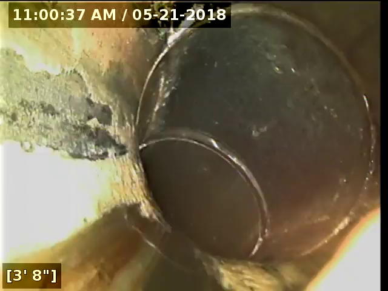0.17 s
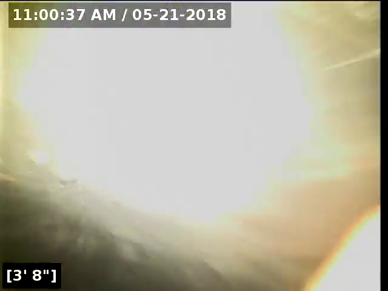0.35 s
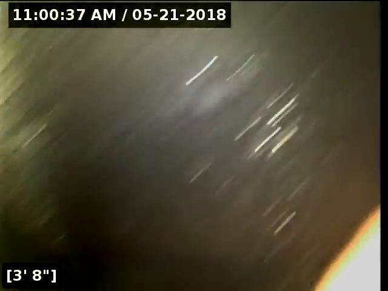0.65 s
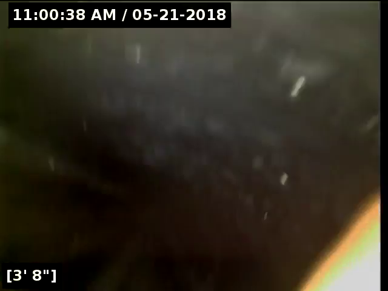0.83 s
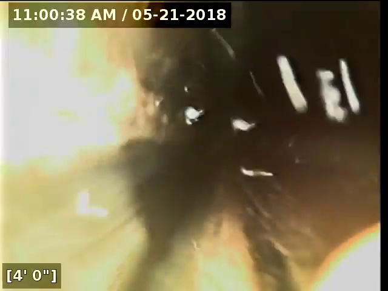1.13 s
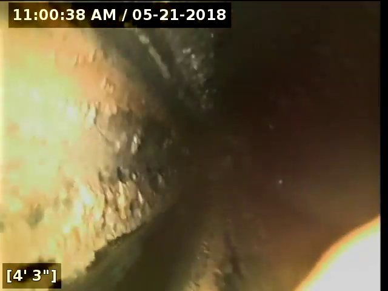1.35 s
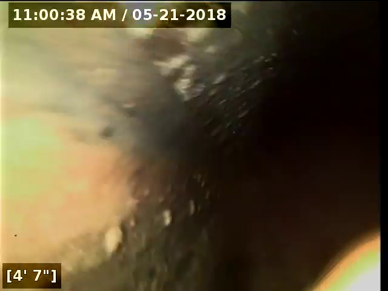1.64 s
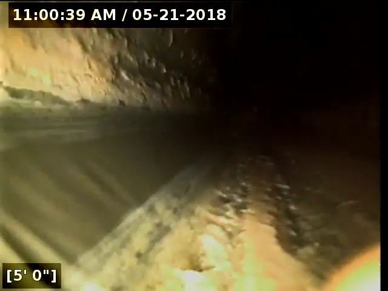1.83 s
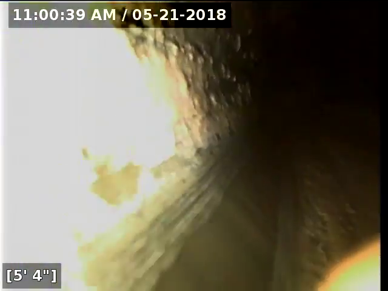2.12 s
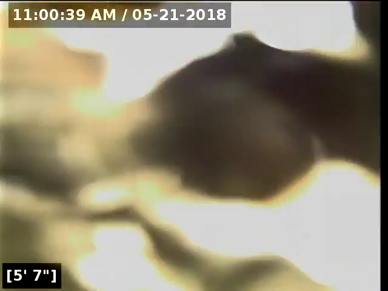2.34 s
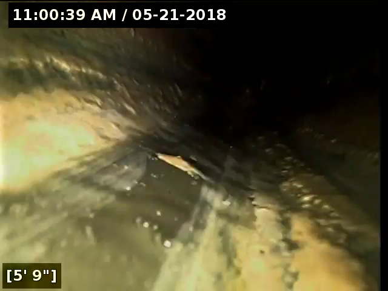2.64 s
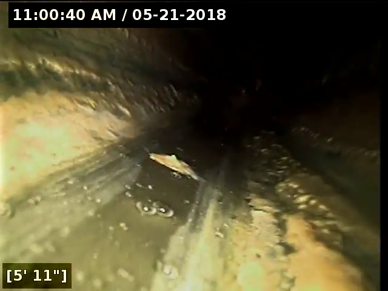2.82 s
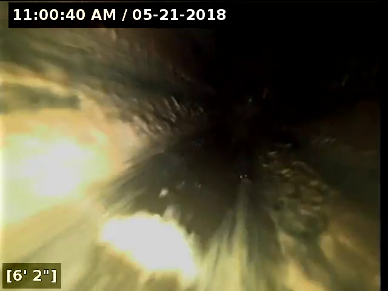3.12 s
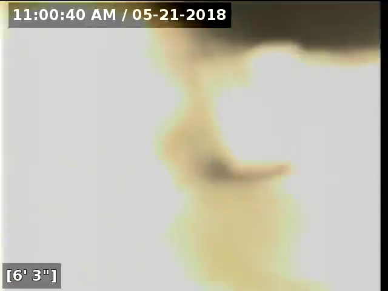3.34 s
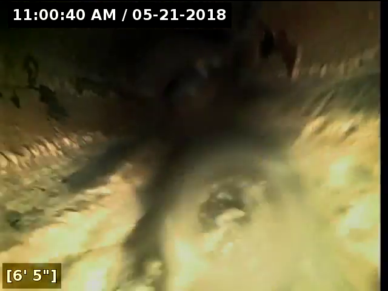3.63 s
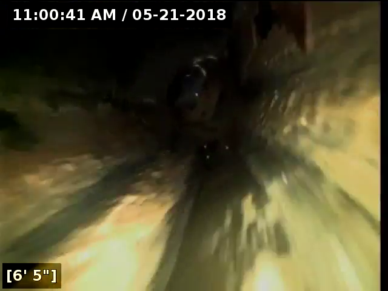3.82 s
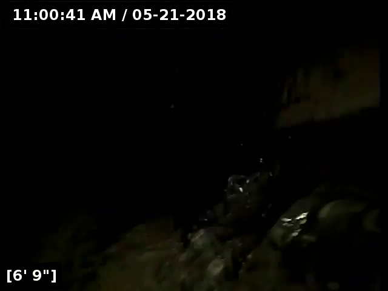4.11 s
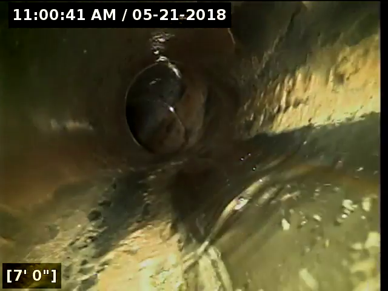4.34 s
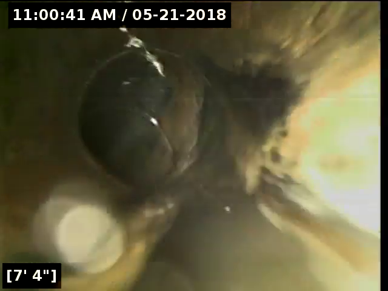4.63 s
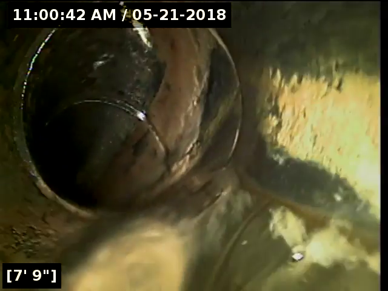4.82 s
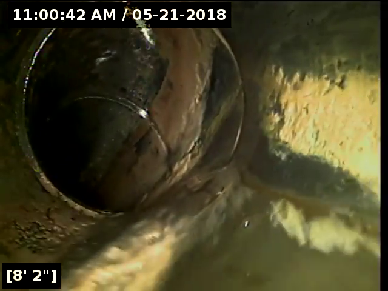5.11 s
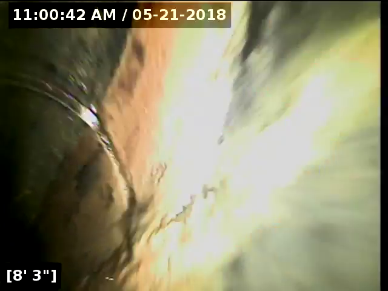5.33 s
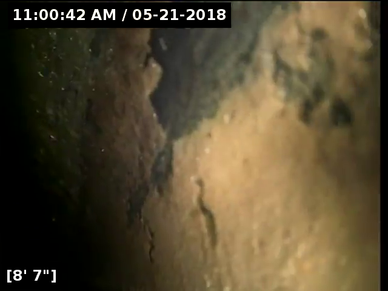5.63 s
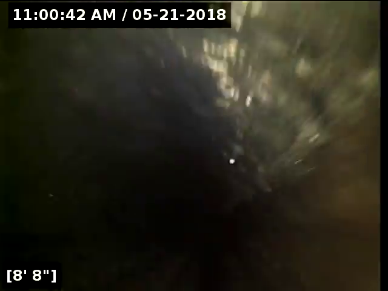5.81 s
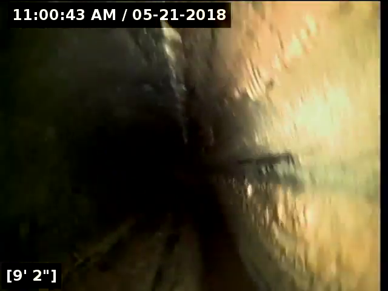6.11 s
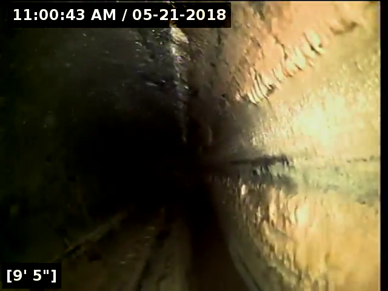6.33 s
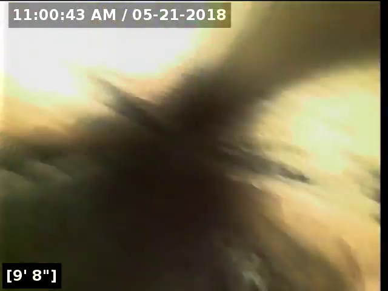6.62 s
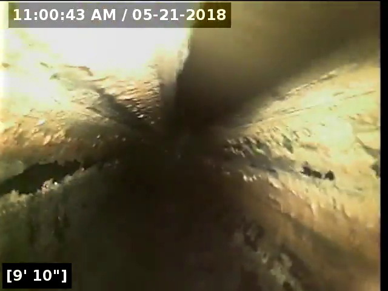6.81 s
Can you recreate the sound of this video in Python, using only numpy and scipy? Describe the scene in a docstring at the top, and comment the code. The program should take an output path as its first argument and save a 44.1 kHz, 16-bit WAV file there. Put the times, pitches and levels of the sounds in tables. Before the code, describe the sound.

Close and dry, with slight pipe hollowness: rubbing cable, a lumpy rolling reel and scattered clicks and thuds. A violent crack comes within the first second, then several medium knocks, another sharp blow near the middle, and quieter pushing after. Two rough creaking groans appear in the later part, with sound cutting out completely for an instant between them. The small microphone distorts on the strongest hit and lacks high treble.

```python
"""Push cable fed into a drain pipe

An inspection camera's stiff cable is shoved by hand from its reel into a plastic pipe. Each shove
makes shaped noise: hiss and rub. The reel rolls on with a noisy whirr and a rumble. Knocks on pipe
and frame are short noise bursts plus ringing tones. Twice a hard drag makes the reel groan: rasping
resonances and a rough tone. Strong peaks overload the small microphone, and the sound drops out briefly."""
import sys
import numpy as np
from scipy import signal
from scipy.fft import rfft, irfft, next_fast_len
from scipy.io import wavfile
from scipy.ndimage import uniform_filter1d

SR = 44100
rng = np.random.default_rng(int(sys.argv[2]) if len(sys.argv) > 2 else 0)


def wrap_up_sound(samples):
    """Save the sound to the file named by the first command line argument, as 16-bit audio."""
    columns = np.atleast_2d(samples).T
    # keep every value between -1 and 1, then stretch to whole-number steps
    tamed = np.clip(columns, -1, 1)
    steps = np.round(tamed * 32767).astype(np.int16)
    wavfile.write(sys.argv[1], SR, steps)


N = 306936   # samples, just under 7 s
TIME = np.arange(N) / SR

# In all tables, levels are relative: each layer's trims and spectra are applied on top.

# background noise: f/Hz, level/dB
FLOOR = [(18, -49), (30, -15.5), (58, -16.5), (79, -0.5), (523, -15), (800, -9), (1090, -20.5), (2260, -17),
         (4090, -34.5), (6400, -24), (8500, -33.5), (11000, -74), (18700, -120)]
FLOOR_DB = -55.5

# the reel rolls on: start t/s, length t/s, whirr level/dB, rumble level/dB, starting whirr f/Hz
ROLLS = [(-.1, 0.076, -41, -45.5, 689), (.45, 0.12, -53.5, -47.5, 720), (.57, 0.34, -43, -51, 745),
         (.97, 0.26, -42, -48, 770), (1.235, 0.15, -39.5, -45, 730), (1.65, 0.22, -43.5, -48.5, 700),
         (1.92, 0.099, -40.5, -46.5, 699.4), (2.05, 0.19, -52, -47, 645.7), (2.47, 0.11, -55, -54, 713),
         (2.62, 0.14, -48.5, -50, 768), (2.74, 0.13, -53.5, -47, 730), (3.0, 0.19, -66.5, -59, 705),
         (3.25, .1, -52.5, -50.5, 734), (3.42, 0.21, -47, -51.5, 725.5), (3.63, 0.1223, -45.5, -45.5, 700),
         (3.8, .2, -59.5, -55, 680), (4.03, .17, -51.5, -62, 752), (4.24, 0.18, -50, -49.5, 778),
         (4.72, .2, -54.5, -51, 650.6), (5.09, 0.17, -58.5, -53, 679.7), (5.4, 0.22, -47, -52, 680),
         (5.58, 0.22, -55, -50, 642.3), (5.98, 0.19, -60.5, -56, 745.6), (6.14, 0.1298, -52, -51, 752),
         (6.32, .14, -52, -47, 797), (6.69, 0.21, -51.5, -45.5, 749), (6.89, .1, -41.5, -52.5, 780)]
# each roll starts quickly, loses level and pitch to friction, then dies away
ROLL_ATTACK_S, ROLL_RELEASE_S, ROLL_LOSS_DB_PER_S, WHIRR_SAG_HZ_PER_S = 0.011, 0.0722, 16.5, 320
IDLE_RUMBLE_DB = -60   # steady rumble of the reel rocking
# spectrum of the reel's rumble: f/Hz, level/dB
RUMBLE = [(25, -20.5), (60, -29), (110, 12), (170, 14), (280, 12), (380, -5), (450, 8), (600, 6),
          (1100, -53)]

# hand shoves: t/s of top speed, speeding-up t/s, slowing-down t/s, hiss level/dB, rub level/dB
SHOVES = [(.02, 0.041, 0.037, -61, -50), (0.509, 0.059, .17, -56.5, -46), (1.111, 0.1, 0.082, -51, -51),
          (1.77, .09, .08, -49.5, -49.5), (2.2, 0.06, 0.12, -87, -63), (2.38, .09, 0.16, -53, -51),
          (2.68, .05, 0.077, -58.5, -54), (2.93, 0.047, .1, -82, -55.5), (3.09, 0.079, 0.1, -55.5, -60),
          (3.45, 0.058, 0.16, -54.5, -49.5), (4.021, 0.085, 0.23, -55, -52), (4.68, 0.095, .1, -56, -59),
          (4.831, 0.068, 0.11, -49.5, -51), (5.25, 0.028, 0.042, -72, -62), (5.48, 0.1, 0.12, -52, -54.5),
          (6.07, .15, .1, -53, -51), (6.68, .14, 0.12, -53.5, -52)]
CREEP_HISS_DB, CREEP_RUB_DB = -70, -73   # the cable keeps creeping between shoves
# spectrum of the cable's fine hiss: f/Hz, level/dB
HISS = [(2500, -3), (3500, -6), (4800, -5.5), (6400, 0), (7300, -2), (8200, -10), (9000, -27.5)]
# spectrum of the cable's coarser rub: f/Hz, level/dB
RUB = [(300, 6), (700, -10.5), (1000, 4), (1400, 6), (2050, -2.5), (2500, 6), (2850, 3), (3400, -6.5),
       (4500, -30.5), (7000, -23.5)]
# natural tones (modes) of pipe and reel frame: f/Hz, level/dB
BODY = [(195, -7.5), (278, 3), (320, 0.5), (465, 1.5), (752, 3), (850, -2.5), (1022, -3), (1427, -5.5),
        (1589, -18.5), (1748, -19.5), (2169, -9), (2487, -5), (2718, -10), (2870, 4)]

# cable knocks on pipe and frame: t/s, strength level/dB, tilt/dB per octave, treble loss/dB per octave,
# contact t/s, extra thud level/dB, hollow note level/dB relative to the blow
KNOCKS = [(.459, -46.5, 0.5, 13, 0.0049, 4, -11), (.579, -42, 5, 22, 0.0054, -6, -21),
          (0.59, -53, -8, 10, 0.0052, 4, -17), (.650, -56.5, 14, 25.5, .0045, 5, -4),
          (0.726, -24.5, -2.5, 28, 0.00046, 11.5, 8), (.7276, -11.5, -2, 5, 0.0028, -13, -12),
          (0.825, -28, -2.2, 54, 0.0079, 9, -22), (.889, -35.5, -1.5, 25, 0.0042, 4.5, 1.5),
          (.967, -48.5, 3, 18, 0.0043, 1, -17), (1.182, -31.5, -5, 23, 0.0018, -7, 0),
          (1.237, -36.5, 3, 13, .005, -7, -6), (1.454, -30, -6, 14, 0.0052, -0.5, -5.5),
          (1.732, -52, 7.5, 16, 0.0044, -2, -7), (1.771, -44.5, 1, 0.5, 0.0076, 8.5, -18),
          (1.839, -46, 7, 18.5, .0036, 3, -10), (1.927, -46, -2, 9, 0.0041, -3, -16),
          (1.997, -54, 4, 24, 0.0034, -5, -10), (2.078, -52.5, -9, 4, 0.0061, 9.5, 2),
          (2.267, -51, -2, 10, .006, -4, 4), (2.752, -48, -9.5, 6, 0.00516, 1, -11),
          (3.2044, -20, -1, 8, 0.0045, 5.5, -7), (3.301, -52.5, 6, 20.5, .0042, -3, 1),
          (3.336, -44.5, 2.5, 18.5, 0.0019, -7, -4), (3.546, -42, 6, 16.5, 0.0028, -2, -1),
          (3.627, -47, 5, 23, 0.0046, 0, -9), (3.686, -49, 0, 11, 0.0048, 1, 8),
          (3.976, -50, 5.5, 19, 0.0025, -6, -15), (4.101, -51, 4.5, 14.5, .003, -7, -5),
          (4.185, -43, -2.5, 8, 0.0041, -13, -11), (4.426, -30.5, -2, 6, 0.0043, -2, -4),
          (4.495, -68, 14.5, 29, 0.0014, 8, -6), (5.089, -42.5, -3, 11, .012, 2, -9.5),
          (5.568, -47.5, 4.5, 15.5, 0.0056, 4, -13), (5.8295, -39.5, 3, 49, .0057, 16, 8.5),
          (5.881, -57, -5.5, 20, 0.0085, 20, 2), (6.163, -45, 7, 17, 0.0057, 0, -11),
          (6.182, -51, 2, 16, 0.0089, -2, -12), (6.433, -64.5, 11.5, 27, .008, -3, 2),
          (6.774, -40.5, 6, 16.5, 0.0049, 2, -6), (6.874, -50, -2, 14, 0.00326, -9, -14),
          (6.939, -46, -4, 9, 0.012, 4, 3)]
# dying away of the knock's noise, by pitch: f/Hz, t/s to fall 60 dB
KNOCK_RING = [(60, .07), (270, 0.14), (500, 0.012), (1000, 0.051), (2500, 0.058), (7000, 0.041)]
# spectrum of the knock's noise: f/Hz, level/dB
KNOCK_COLOUR = [(40, -23.5), (130, -31), (200, -10.5), (290, -3.5), (450, -0.5), (610, -2.5), (800, 1),
                (1300, -1.5), (2600, 0), (3500, -5.5), (4800, -11.5), (6500, 9.5), (8500, -43)]
# ring of the modes, damped by the cable that stays against them: f/Hz, t/s to fall 60 dB
MODE_RING = [(195, .07), (280, .08), (330, .062), (470, .05), (750, .06), (1500, .055), (2900, .045)]
# the tilt pivots on the centre pitch; treble loss starts at the edge; modes below THUD_HZ make the thud
KNOCK_CENTRE_HZ, KNOCK_EDGE_HZ, THUD_HZ = 787, 2450, 380
KNOCK_ARCH_DB = 1   # loss per squared octave away from the centre
KNOCK_FLAT_BELOW_HZ = 510   # a blow is equally strong at all pitches below this
HOLLOW_HZ, HOLLOW_T60_S = 436, 0.16   # the pipe's hollow note and its time to fall 60 dB

# the cable drags hard on the reel: start t/s, length t/s, level/dB
DRAGS = [(4.761, 0.15, -39), (5.406, 0.096, -40.5)]
DRAG_ATTACK_S, DRAG_RELEASE_S, DRAG_LOSS_DB_PER_S = .05, .06, 14
SLIP_HZ, SLIP_RISE_HZ_PER_S = 302, 35.2   # stick-slip rate halfway through a drag, and its climb
# harmonics of the groan's tone: multiple of the slip rate, level/dB
GROAN_TONES = [(1, -11), (2, -4), (3, -21)]
# resonances of the groan's rasp: f/Hz, half the width f/Hz of each of its two filters, level/dB
GROAN = [(726, 13, -1), (1134, 8.5, 1), (1270, 66, -1.5), (1490, 19, 1), (1610, 4.9, 7.5),
         (1783, 26, -18.5), (1930, 95, -0.5), (2780, 180, -2.5), (2990, 23, 2.5), (3310, 41, -8.5)]

# silent gap: from t/s, to t/s
DROPOUT = (4.953, 5.088)
NOTCH_HZ, NOTCH_WIDTH_HZ = 4040, 760     # dip in the treble
ROLLOFF_HZ, CUTOFF_HZ = 7200, 8700       # gentler, then steep top edge


def from_db(db):
    """Turn decibels into a gain."""
    return np.exp(np.asarray(db) * (np.log(10) / 20))


def rms_one(x):
    """Scale to an average (rms) strength of 1."""
    return x / np.sqrt(np.mean(x ** 2) + 1e-20)


def at_hz(points, hz):
    """Read a table between its rows, with pitch on a logarithmic axis."""
    table_hz, values = np.array(points).T
    return np.interp(np.log(hz), np.log(table_hz), values)


def drift(rate_hz):
    """Random wander of spread 1: noise smoothed by a double pole at the rate."""
    step = 40   # one wander value per 40 samples
    r = np.exp(-2 * np.pi * step * rate_hz / SR)
    noise = rng.standard_normal(N // step + 2002)
    slow = signal.lfilter([1], [1, -2 * r, r * r], noise)[2000:]   # skip the settling-in
    return np.interp(np.arange(N) / step, np.arange(len(slow)), rms_one(slow))


def resonate(x, hz, width_hz):
    """Let one resonance ring, with a gain of about 1 at its peak."""
    r = np.exp(-np.pi * width_hz / SR)
    feed = np.array([1, 0, -1]) * (1 - r * r) / 2
    feedback = [1, -2 * r * np.cos(2 * np.pi * hz / SR), r * r]
    return signal.lfilter(feed, feedback, x + 1e-18)


def colour(x, spectrum):
    """Multiply a steady noise by a spectrum, then scale to rms 1."""
    size = next_fast_len(N)
    hz = np.maximum(np.arange(size // 2 + 1) * SR / size, 1)
    shaped = rfft(x, size) * from_db(at_hz(spectrum, hz))
    return rms_one(irfft(shaped, size)[:N])


def friction(per_s, spread_db, flutter_db):
    """Rubbing is many tiny slips of uneven size, coming in clumps."""
    happens = rng.random(N) < per_s / SR
    slips = happens * rng.standard_normal(N) * from_db(spread_db * rng.standard_normal(N))
    return rms_one(slips * from_db(flutter_db * drift(25)))


def stroke(start, length, attack_s, release_s, loss_db_per_s):
    """Gain of one movement: it builds up, holds while slowly fading, and dies away."""
    t = np.maximum(TIME - start, 0)
    build_up = np.minimum(t / attack_s, 1)
    release = np.exp(-np.maximum(t - length, 0) / release_s)
    return build_up * from_db(-loss_db_per_s * t) * release


def drag():
    """Strength of the hard drag on the reel, as a gain that also holds back rub and roll."""
    return sum(from_db(db) * stroke(s, length, DRAG_ATTACK_S, DRAG_RELEASE_S, DRAG_LOSS_DB_PER_S)
               for s, length, db in DRAGS)


def background():
    """Faint steady noise shaped by its own spectrum."""
    return from_db(FLOOR_DB) * colour(rng.standard_normal(N), FLOOR)


def reel_motion():
    """Gains of whirr and rumble, and the whirr's pitch, which sinks as each roll slows."""
    whirr_power, rumble_power = np.zeros(N), from_db(2 * IDLE_RUMBLE_DB)
    pitch = np.full(N, float(ROLLS[0][-1]))
    for s, length, whirr_db, rumble_db, hz in ROLLS:
        speed = stroke(s, length, ROLL_ATTACK_S, ROLL_RELEASE_S, ROLL_LOSS_DB_PER_S)
        power = (speed * from_db(whirr_db)) ** 2
        # a roll sets the pitch where it outweighs all earlier rolls together
        pitch = np.where(power > whirr_power, hz - WHIRR_SAG_HZ_PER_S * (TIME - s), pitch)
        whirr_power = whirr_power + power
        rumble_power = rumble_power + (speed * from_db(rumble_db)) ** 2
    return np.sqrt(whirr_power), np.sqrt(rumble_power), pitch


def rolling(whirr_gain, rumble_gain, whirr_hz, whirr_trim_db=-3, rumble_trim_db=-1,
            bump_edge_hz=80, braking_db=-50):
    """The reel turns on its hub: a lumpy rumble and a narrow band of noise at the whirr's pitch."""
    smooth = signal.butter(2, bump_edge_hz, fs=SR, output="sos")
    bumps = signal.sosfilt(smooth, rng.standard_normal((2, N)))
    carrier = np.exp(2j * np.pi * np.cumsum(whirr_hz) / SR)
    # multiplying by the carrier lifts the slow noise up to the whirr's pitch
    whirr = rms_one(np.real((bumps[0] + 1j * bumps[1]) * carrier))
    rumble = colour(friction(per_s=1700, spread_db=1.5, flutter_db=2.0), RUMBLE)
    free = 1 / np.sqrt(1 + drag() / from_db(braking_db))   # drag brakes the reel
    return free * (whirr_gain * from_db(whirr_trim_db) * whirr
                   + rumble_gain * from_db(rumble_trim_db) * rumble)


def shoving(rub_follows=0.41):
    """Gains of hiss and rub: a shove is a bell of speed, which the rub follows less steeply."""
    hiss_power, rub_power = from_db(2 * CREEP_HISS_DB), from_db(2 * CREEP_RUB_DB)
    for s, rise_s, fall_s, hiss_db, rub_db in SHOVES:
        width_s = np.where(TIME < s, rise_s, fall_s)
        speed = np.exp(-np.minimum(((TIME - s) / width_s) ** 2, 20))
        hiss_power = hiss_power + (speed * from_db(hiss_db)) ** 2
        rub_power = rub_power + (speed ** rub_follows * from_db(rub_db)) ** 2
    return np.sqrt(hiss_power), np.sqrt(rub_power)


def scratches(per_s=45, length_s=0.0018):
    """Grit and nicks on the jacket catch now and then, each a short fading noise burst; rms 1."""
    catches = (rng.random(N) < per_s / SR) * rng.random(N)
    burst = signal.lfilter([1], [1, -np.exp(-1 / (length_s * SR))], catches + 1e-18)
    return rms_one(burst * rng.standard_normal(N))


def body(x, wander_db, width_hz=55):
    """A rub sounds each mode more or less strongly as the point of contact travels."""
    return sum(from_db(db + wander_db * drift(17)) * resonate(x, hz, width_hz) for hz, db in BODY)


def sliding(reel_gain, body_db=3, scratch_db=-9.0, handover_db=-49, pivot_hz=2050,
            shove_low_db=-3, shove_high_db=2.0, reel_low_db=-3, reel_high_db=-9):
    """The jacket rubs over the rim: hiss and scratchy rub, bright in a shove, dull as the reel pays out."""
    hiss_gain, rub_gain = shoving()
    hiss = colour(friction(per_s=13000, spread_db=-0.5, flutter_db=1.66), HISS)
    grain = friction(per_s=5900, spread_db=0.5, flutter_db=-2.65)
    rub = colour(grain + from_db(scratch_db) * scratches(), RUB)
    coarse = colour(friction(per_s=1300, spread_db=7.0, flutter_db=4.0), RUB)
    sung = body(coarse, wander_db=5.5)
    rub = rms_one(rub + from_db(body_db) * sung)
    # split the rub at the pivot so that shove and reel can weigh bass and treble differently
    lower = signal.sosfiltfilt(signal.butter(4, pivot_hz, fs=SR, output="sos"), rub)
    low_gain = np.hypot(rub_gain * from_db(shove_low_db), reel_gain * from_db(reel_low_db))
    high_gain = np.hypot(rub_gain * from_db(shove_high_db), reel_gain * from_db(reel_high_db))
    rub = lower * low_gain + (rub - lower) * high_gain
    rub = rub / np.sqrt(1 + drag() / from_db(handover_db))   # under hard drag it gives way to the groan
    return hiss_gain * hiss + rub


def near_echo(x, delay_s=.00239, gain=0.077):
    """A surface close by sends everything back once, which hollows the timbre."""
    echo = np.interp(TIME - delay_s, TIME, x, left=0)
    return (x + gain * echo) / np.sqrt(1 + gain ** 2)


def knock_db(hz, db, tilt_db, loss_db):
    """Level of a blow at one pitch: tilted to bass or treble, with extra loss above the edge."""
    hz = max(hz, KNOCK_FLAT_BELOW_HZ)
    tilt = tilt_db * np.log2(hz / KNOCK_CENTRE_HZ)
    arch = KNOCK_ARCH_DB * np.log2(min(hz, KNOCK_EDGE_HZ) / KNOCK_CENTRE_HZ) ** 2
    return db + tilt - arch - loss_db * max(np.log2(hz / KNOCK_EDGE_HZ), 0)


def knock_chatter(level_db=-13.5, tail_db=-36, tail_t60_s=0.16, attack_share=0.38,
                  bounce_db=-3.0, graze_db=-25, graze_s=.004):
    """The cable grazes, lands and bounces: noise bursts whose pitch bands die away at their own rates."""
    size = int(.11 * SR)
    t = np.arange(size) / SR - graze_s   # 0 is the landing
    out = np.zeros(N + size)
    edges = np.geomspace(35, 9500, 22)   # band edges in Hz
    white = rng.standard_normal((2, N + size))
    bounces = np.pad(from_db(bounce_db * drift(290)), (0, size), mode="edge")
    for k, pair in enumerate(zip(edges, edges[1:])):
        hz = np.sqrt(np.prod(pair))
        band_filter = signal.butter(2, pair, "band", fs=SR, output="sos")
        band = signal.sosfilt(band_filter, white[k % 2]) * bounces
        for s, *blow, contact, _, _ in KNOCKS:
            at = int((s - graze_s) * SR)
            rise = np.clip(t / max(attack_share * contact, 1 / SR), 0, 1) ** 2 + from_db(graze_db)
            after = np.maximum(t - contact, 0)
            fall = from_db(-60 * after / at_hz(KNOCK_RING, hz))
            tail = from_db(tail_db - 60 * after / tail_t60_s)
            strength = knock_db(hz, *blow) + at_hz(KNOCK_COLOUR, hz)
            burst = rms_one(band[at:at + size] * rise * (fall + tail))
            out[at:at + size] += from_db(strength + level_db) * burst
    return out[:N]


def knock_modes(level_db=-2.0, scatter_db=2.95):
    """Each blow sets the modes ringing, with random weights for where it lands, plus the hollow note."""
    t = np.arange(int(.2 * SR)) / SR
    out = np.zeros(N + SR)
    luck = rng.standard_normal((len(KNOCKS), len(BODY)))
    for (s, *blow, contact, thud_db, hollow_db), weights in zip(KNOCKS, luck):
        at, contact = int(s * SR), max(contact, 1 / SR)
        swell = np.minimum(t / contact, 1) ** 2
        after = np.maximum(t - contact, 0)
        modes = []
        for (hz, db), weight in zip(BODY, weights):
            mode_db = knock_db(hz, *blow) + db + level_db + thud_db * (hz < THUD_HZ) + scatter_db * weight
            modes.append((hz, at_hz(MODE_RING, hz), mode_db))
        modes.append((HOLLOW_HZ, HOLLOW_T60_S, knock_db(HOLLOW_HZ, *blow) + hollow_db))
        for k, (hz, t60_s, db) in enumerate(modes):
            ring = (-1) ** k * np.sin(2 * np.pi * hz * (t - contact))   # neighbours move oppositely
            out[at:at + len(t)] += swell * ring * from_db(db - 60 * after / t60_s)
    return out[:N]


def groan(waver_db=2.0, jitter=0.0108, rasp_db=-3.5, tone_lag_s=0.016):
    """Hard drag keeps resonances rasping, each wavering alone; a rough stick-slip tone follows later."""
    force = drag()
    slip_hz = SLIP_HZ
    for s, length, _ in DRAGS:
        from_middle = TIME - s - length / 2
        slip_hz = slip_hz + SLIP_RISE_HZ_PER_S * from_middle * (abs(from_middle) < 2 * length)
    phase = 2 * np.pi * np.cumsum(slip_hz * (1 + jitter * drift(70))) / SR
    tone = sum(np.sqrt(2) * np.sin(k * phase) * from_db(db + waver_db * drift(25))
               for k, db in GROAN_TONES)
    slips, rasp = friction(per_s=2500, spread_db=2.0, flutter_db=0.0), 0
    for hz, half_width, db in GROAN:
        mode = resonate(resonate(slips, hz, 2 * half_width), hz, 2 * half_width)
        # friction limits the swing: even out the level over 2600 samples
        mode = mode / np.sqrt(uniform_filter1d(mode ** 2, size=2600) + 1e-14)
        rasp = rasp + mode * np.sqrt(half_width) * from_db(db + waver_db * drift(29))
    late_force = np.interp(TIME - tone_lag_s, TIME, force)
    return late_force * tone + force * from_db(rasp_db) * rms_one(rasp)


def scene():
    """Reel, sliding cable, knocks and groan over a faint background noise."""
    floor = background()
    whirr, rumble, whirr_hz = reel_motion()
    reel = rolling(whirr, rumble, whirr_hz)
    echoed = near_echo(sliding(rumble) + knock_chatter())
    return (floor + reel + echoed + knock_modes() + groan())[None]


def overload(x, sag_db=-2, sag_hz=70):
    """Strong peaks pull the microphone's bias down with a thump, and get flattened."""
    excess = np.tanh(x ** 4)
    thump = signal.sosfilt(signal.butter(1, sag_hz, fs=SR, output="sos"), excess)
    x = x - from_db(sag_db) * thump
    return x / (1 + (x / .84) ** 6) ** (1 / 6)   # output stays within 0.84


def record(dry):
    """Overload, the short dropout, a notch in the treble and a dull top edge."""
    x = overload(dry)
    x = x * ((TIME < DROPOUT[0]) | (TIME > DROPOUT[1]))
    notch_edges = [NOTCH_HZ - NOTCH_WIDTH_HZ / 2, NOTCH_HZ + NOTCH_WIDTH_HZ / 2]
    x = signal.sosfilt(signal.butter(2, notch_edges, "bandstop", fs=SR, output="sos"), x)
    x = signal.sosfilt(signal.butter(6, ROLLOFF_HZ, fs=SR, output="sos"), x)
    return signal.sosfilt(signal.ellip(8, .2, 70, CUTOFF_HZ, fs=SR, output="sos"), x)


dry = scene()
out = record(dry)
wrap_up_sound(out)
```